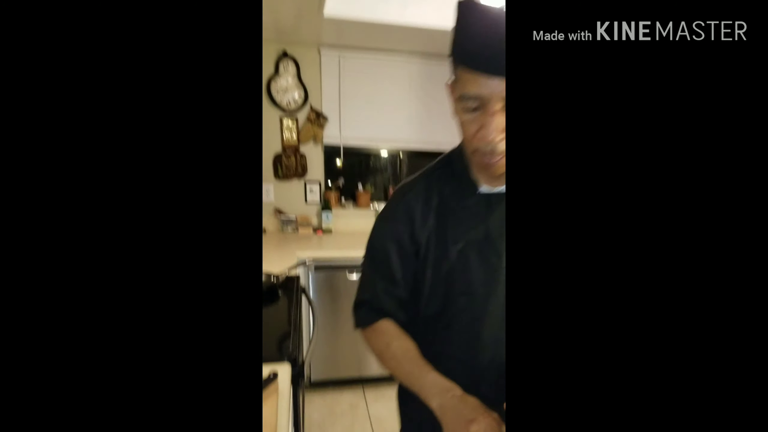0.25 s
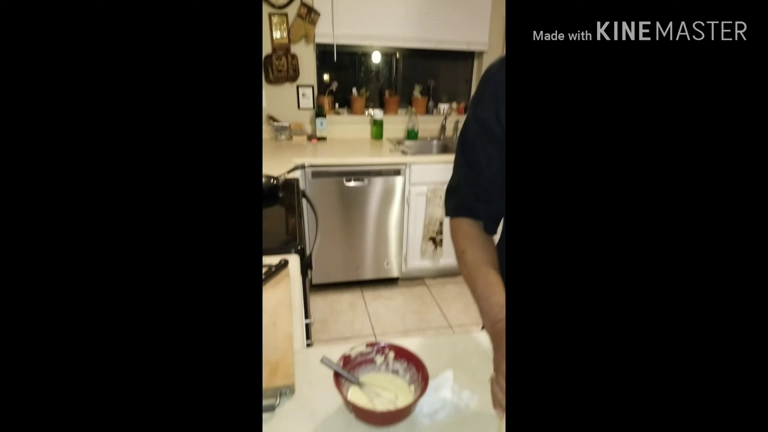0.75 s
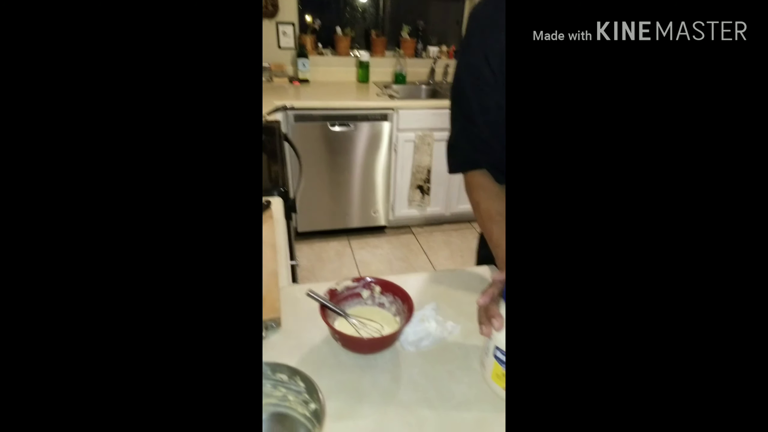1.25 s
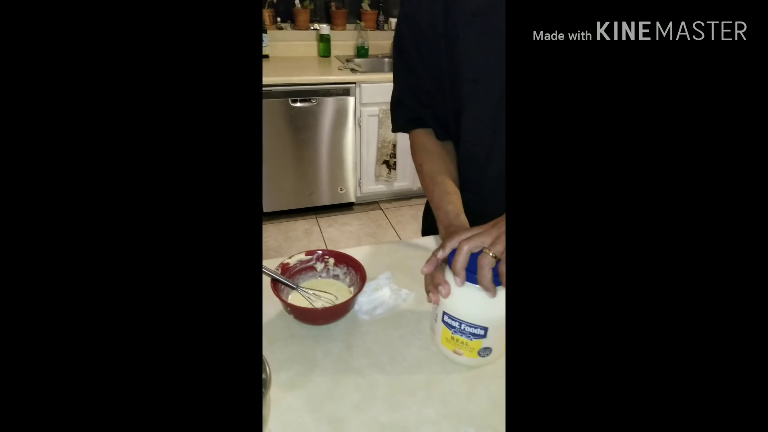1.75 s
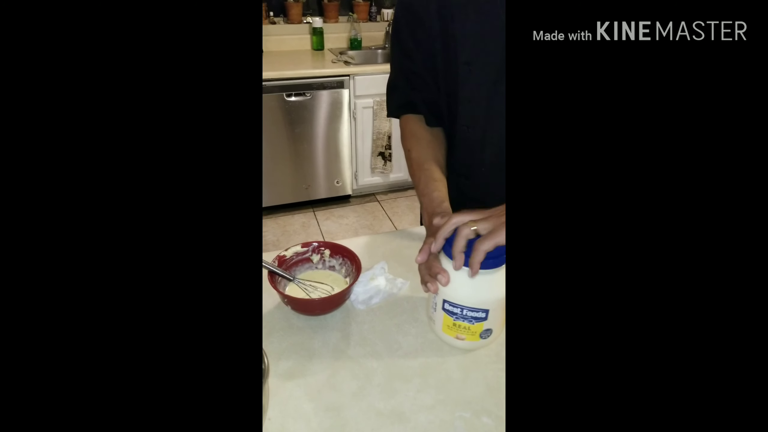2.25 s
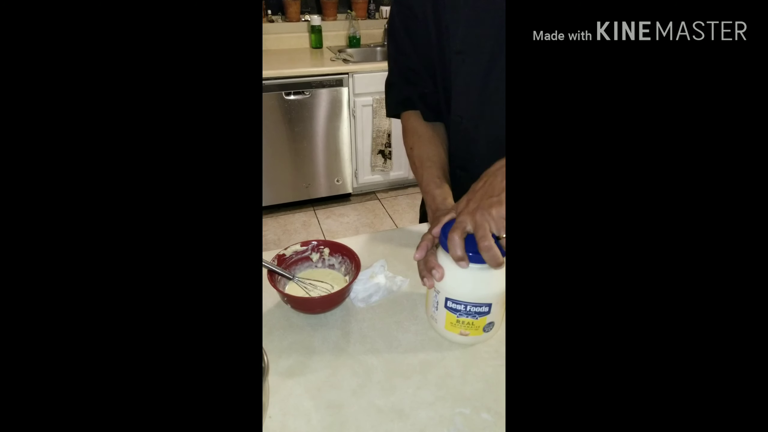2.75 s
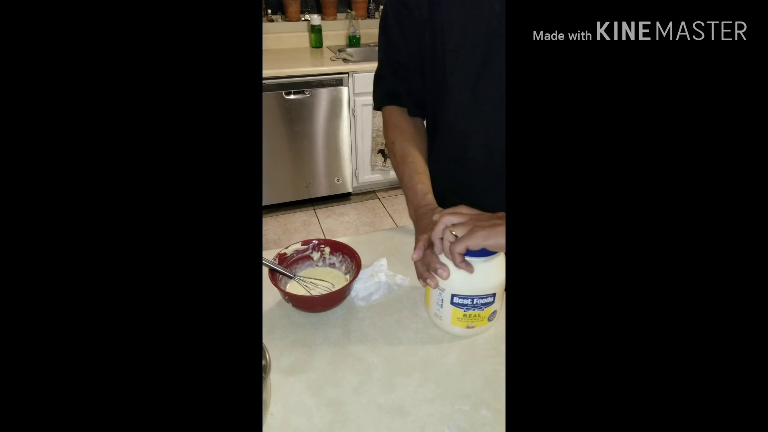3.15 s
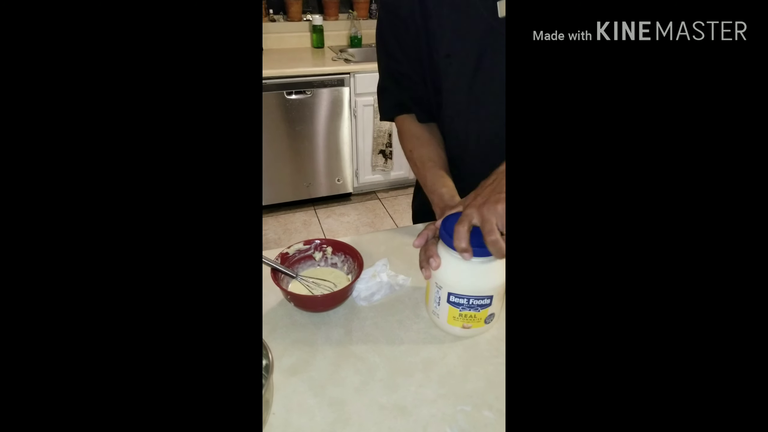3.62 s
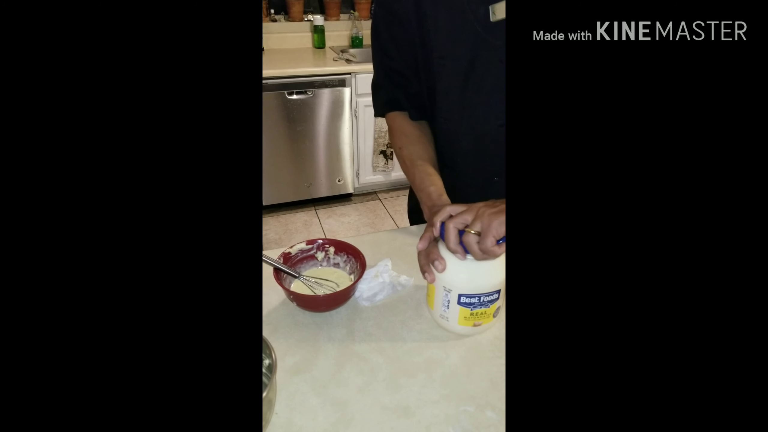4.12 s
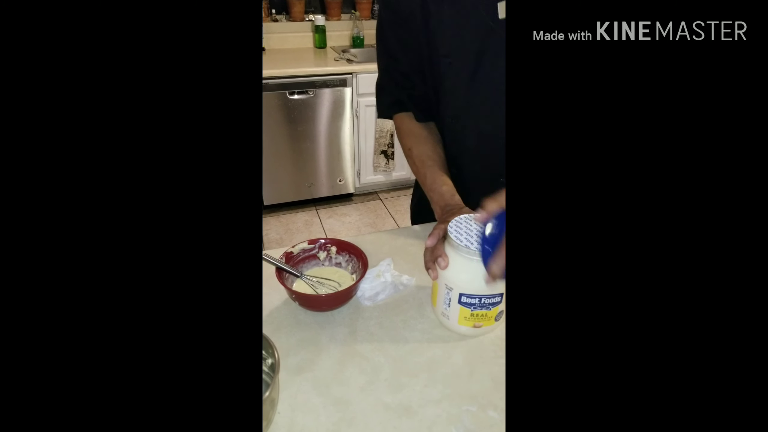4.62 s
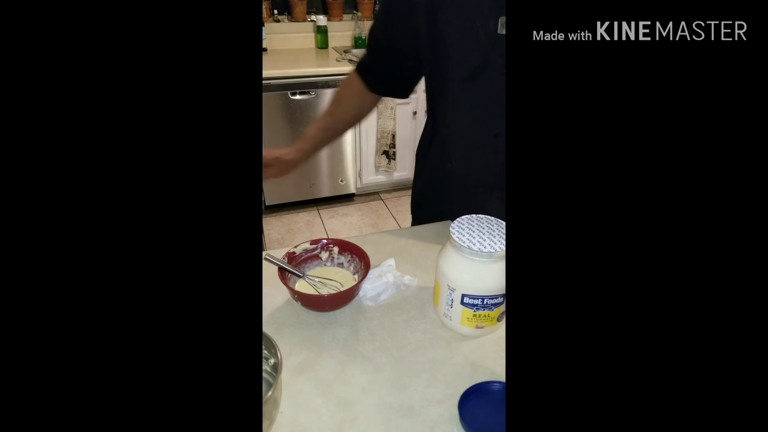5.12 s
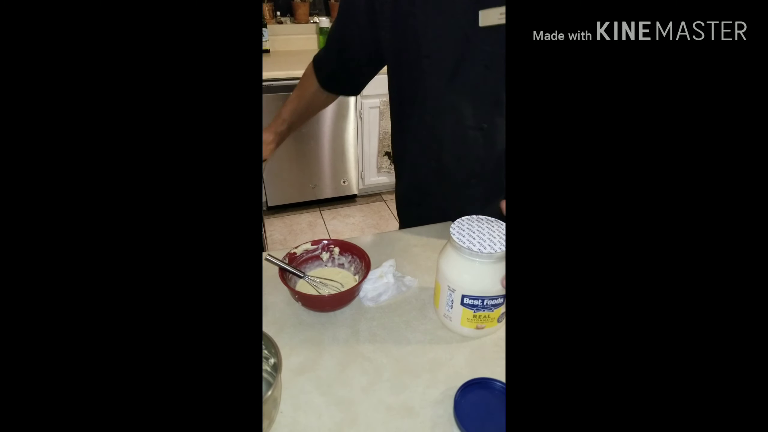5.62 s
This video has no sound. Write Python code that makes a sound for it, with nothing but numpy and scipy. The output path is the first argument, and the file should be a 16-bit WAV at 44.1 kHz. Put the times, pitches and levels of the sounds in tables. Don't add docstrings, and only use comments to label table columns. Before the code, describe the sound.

In a small kitchen with a low fridge hum, a heavy door slams at once, booming and clattering, a loose part ticking rapidly before a second, duller bounce. Then hands rub and twist a plastic jar lid in short hissing strokes, with snaps, a slap and soft counter thuds. The thread clicks free and the lid lands with a bright clack, tips and settles. Close stereo phone pickup.

```python
import sys
import numpy as np
from scipy import signal
from scipy.fft import rfft, irfft
from scipy.io import wavfile
from scipy.ndimage import uniform_filter1d

SR = 44100
rng = np.random.default_rng(int(sys.argv[2]) if len(sys.argv) > 2 else 0)


def gain_from_db(level_db):
    decades = np.asarray(level_db, float) / 20
    return 10 ** decades


def wrap_up_sound(samples):
    columns = np.atleast_2d(samples).T
    tamed = np.clip(columns, -1, 1)
    steps = np.round(tamed * 32767).astype(np.int16)
    wavfile.write(sys.argv[1], SR, steps)


N = 259308

# [start_s, boom_db, swell_ms, clatter_db, clatter_ms]
SLAM = [
    (.056, -7.5, 16, -12.5, 58.2),
]
DOOR_LAG, JAR_LAG = -20, 8
DOOR_PAN_DB, JAR_PAN_DB, LID_PAN_DB = 2.5, -0.5, -1.5


def unit(x):
    return x / np.sqrt(np.mean(x ** 2))


def colour(x, points):
    hz, db = np.transpose(points)
    n = x.shape[-1]
    f = np.maximum(np.arange(n // 2 + 1) * SR / n, 1)
    gain_db = np.interp(np.log(f), np.log(hz), db)
    return irfft(rfft(x) * gain_from_db(gain_db), n)


def band(x, lo_hz, hi_hz):
    edges_hz = [lo_hz, min(hi_hz, .45 * SR)]
    return signal.sosfilt(signal.butter(2, edges_hz, "bandpass", fs=SR, output="sos"), x)


def diffuse(n, apart_db=0.):
    mid, side = rng.standard_normal((2, n))
    side = gain_from_db(apart_db) * colour(side, [(25, -30.0), (125, -4.5), (300, -12.5), (600, -1.0), (16000, 1.5)])
    return np.array([mid + side, mid - side])


def walk(rate_hz):
    k = int(SR / rate_hz)
    steps = np.repeat(rng.standard_normal(N // k + 1), k)
    return 1.45 * uniform_filter1d(uniform_filter1d(steps, k), k)[:N]


def add(out, start_s, x):
    i = int(start_s * SR)
    out[..., i:i + x.shape[-1]] += x[..., :N - i]


def fade(t, t60_s):
    return gain_from_db(-60 * t / max(t60_s, .001))


def place(x, lag, wet_db):
    # [pitch_hz, t60_s]
    room = [(100, 0.32), (400, 0.36), (1500, 0.24), (4000, 0.21), (8000, 0.18), (14000, 0.14)]
    t = np.arange(SR // 2) / SR
    noise = diffuse(len(t))
    tail = sum(band(noise, hz / 1.57, hz * 1.447) * fade(t, t60_s) for hz, t60_s in room)
    bins = rfft(tail * np.minimum(t / 0.00067, 1))
    power = np.abs(bins) ** 2
    even = np.sqrt(uniform_filter1d(power, size=500) / uniform_filter1d(power, size=50))
    tail = irfft(bins * even)[:, :-500]
    tail = tail / np.sqrt(np.sum(tail ** 2) / 2)
    direct = np.array([np.roll(x[0], lag // 2), np.roll(x[1], -lag // 2)])
    return direct + gain_from_db(wet_db) * signal.fftconvolve(x, tail, axes=1)[:, :N]


def fridge():
    # [pitch_hz, level_db]
    floor = [(25, -42.5), (48, 0.5), (62, -1), (83, -1), (124, -11.5), (190, -4), (330, -5), (430, -4.5),
             (520, -20), (1000, -22.5), (3500, -36.5), (5500, -35.5), (9300, -41.5), (15500, -36)]
    # [pitch_hz, level_db]
    mains = [(60, -61.5), (120, -65.5)]
    floor_db, duck_db, duck_s = -57.5, -7, 1.56
    t = np.arange(N) / SR
    hum = sum(gain_from_db(db + 2.5 + 3.0 * walk(1.7)) * np.sin(2 * np.pi * hz * t) for hz, db in mains)
    dip_db = duck_db * np.exp(-(t / duck_s) ** 4) * (t > SLAM[0][0])
    return unit(colour(diffuse(N), floor)) * gain_from_db(floor_db + 0.52 * walk(1.6) + dip_db) + hum


def pushed_slab(pushes, rumble_db):
    out, t = np.zeros(N), np.arange(SR // 2) / SR
    for start_s, peak_db, hz, t60_s in pushes:
        rumble = unit(band(rng.standard_normal(len(t)), 77, 300)) * fade(t, 1.07 * t60_s)
        ring = np.sin(2 * np.pi * hz * t) * fade(t, t60_s)
        window = np.minimum(t / 0.0089, 1) * np.cos(np.pi * t)
        add(out, start_s, gain_from_db(peak_db) * (ring + gain_from_db(rumble_db) * rumble) * window)
    return out


def cabinet_rocking():
    # [start_s, peak_db, pitch_hz, t60_s]
    rocks = [
        (.54, -28.5, 97, 1.0),
        (.72, -29.5, 59.7, 0.42),
        (.80, -33, 98.3, 0.6),
        (.85, -40, 59.7, 0.36),
        (.82, -46, 263, 0.25),
        (.91, -36, 248, 0.068),
        (.945, -38, 58.7, 0.7),
    ]
    return pushed_slab(rocks, -20.0)


def counter_thuds():
    # [start_s, peak_db, pitch_hz, t60_s]
    thuds = [(0.004, -40, 194, 0.17), (0.397, -28, 78.2, 0.091), (1.404, -48.5, 830, 0.29),
             (1.443, -31.5, 1410, 0.03), (1.434, -39.5, 74.6, 0.26), (1.469, -37.5, 69, 0.158),
             (1.741, -42, 194, 0.14), (1.76, -46.5, 276, 0.19), (2.08, -42, 68, 0.26),
             (2.331, -49, 61.7, 0.067), (2.74, -45, 334, 0.14), (2.919, -50, 68, 1), (3.509, -49, 58, 1),
             (3.606, -41, 285, 0.17), (3.689, -42.5, 70.5, 0.46), (4.049, -46, 64.6, 0.21),
             (4.485, -38.5, 64, 0.31), (5.29, -42.5, 400, 0.21), (5.358, -30, 97, 0.06),
             (5.379, -39.5, 71.1, 0.5), (5.456, -36, 70.7, 0.53), (5.489, -34, 111, 0.14),
             (5.559, -50, 130, 0.1), (5.639, -43.5, 261.4, 0.26), (5.739, -40.5, 135, 0.14),
             (1.85, -52, 383, 0.41), (2.025, -44, 402, 0.11)]
    return pushed_slab(thuds, -6.0)


def struck_door(blows, modes, clatter):
    boom, rattle, t = np.zeros(N), np.zeros((2, N)), np.arange(SR) / SR
    short_t = t[:SR // 4]
    for start_s, boom_db, swell_ms, clatter_db, clatter_ms in blows:
        for hz, db, t60_s in modes:
            chance = rng.standard_normal(31)
            waver_db = 0.82 * np.interp(t * 30, np.arange(30), chance[1:])
            swell = (1 - np.exp(-t * 1000 / swell_ms * (hz / 300) ** 0.16)) ** 2
            tone = np.sin(2 * np.pi * (hz * t + chance[0])) * fade(t, t60_s)
            add(boom, start_s, gain_from_db(boom_db + db + waver_db) * tone * swell)
        jolts = unit(colour(diffuse(SR // 4, -0.82), clatter))
        add(rattle, start_s, gain_from_db(clatter_db) * jolts * np.exp(-(short_t * 1000 / clatter_ms) ** 1.44))
    return boom * np.array([[1.06], [.94]]), rattle


def door_slam():
    # [pitch_hz, level_db, t60_s]
    modes = [(59, -6.5, 0.69), (98.2, -1, 0.67), (119, -4.5, 0.15), (169, 3, 0.32), (191.8, 2, 0.29),
             (296, -7.5, 0.14), (320, -3, 0.34), (337.6, 8, 0.22), (413, -7, 0.27), (434.5, -6, 0.25),
             (485, -12, 0.32), (603, -12.5, 0.3), (745, -14, .22), (994, -17, .2)]
    # [pitch_hz, level_db]
    clatter = [(88, -24), (150, 0), (255, -9), (336, -6.5), (814, -20), (972, -14.5), (1050, -21),
               (1650, -19), (4970, -26.5), (12500, -41.5), (16500, -65)]
    return struck_door(SLAM, modes, clatter)


def door_bounces():
    # [start_s, boom_db, swell_ms, clatter_db, clatter_ms]
    bounces = [
        (.378, -43, 1.3, -31.5, 8.1),
        (.489, -9.5, 16.5, -15.5, 22),
        (.680, -32.5, 2.2, -40.5, 60),
        (.816, -37.5, 5, -42, 21),
        (.908, -39, 7.2, -52.5, 12.2),
    ]
    # [pitch_hz, level_db, t60_s]
    modes = [(62.6, -17, .64), (97, -16, 0.3), (135, -5.5, 0.15), (170, -2.5, 0.2), (194, -12, 0.36),
             (265, 3.5, 0.067), (302, -5.5, 0.26), (338, -4.5, 0.29), (405, -10.5, 0.18),
             (442.3, -15, 0.22), (484, -17, 0.17), (531, -14, 0.17), (600, -18, 0.2), (666, -35, .15)]
    # [pitch_hz, level_db]
    clatter = [(88, -4), (150, 4), (343, -0.5), (682, -20.5), (2650, -18.5), (3350, -36), (3700, -26),
               (11100, -41.5), (15300, -48), (16500, -74.5)]
    return struck_door(bounces, modes, clatter)


def loose_part():
    # [start_s, tick_db, ping_db]
    swings = [
        (0.1111, -19.5, -28.5),
        (0.1636, -22, -33.5),
        (0.2141, -25.5, -36.5),
        (0.2639, -26, -38),
        (0.3132, -27.5, -37.5),
        (0.365, -29.5, -39.5),
        (0.4164, -32.5, -40.5),
        (0.465, -38, -49),
    ]
    out, t = np.zeros((2, N)), np.arange(SR // 50) / SR
    for start_s, tick_db, ping_db in swings:
        knock = diffuse(len(t), -2.1)
        ping = np.sin(2 * np.pi * 6400 * t)
        add(out, start_s + .0008, gain_from_db(tick_db + 4) * band(knock, 10500, 16000) * fade(t, 0.013))
        add(out, start_s + .002, gain_from_db(ping_db + 9) * band(knock, 2400, 8000) * fade(t, .03))
        add(out, start_s + .0042, gain_from_db(ping_db + 12) * ping * fade(t, .006))
    return out


def clicks(contacts, modes, pan_db, body_lo_hz=380):
    out, t = np.zeros((2, N)), np.arange(SR // 14) / SR
    for start_s, peak_db, body_db, fizz_db, length_ms in contacts:
        grain_db = 2.5 * rng.standard_normal(len(t) // 16 + 1).repeat(16)[:len(t)]
        crack = diffuse(len(t), -4.) * gain_from_db(grain_db)
        age = t * 1000 / max(length_ms, .3)
        force = np.exp(-age) * (1 - np.exp(-age / 0.11))
        energy = np.sum(force ** 2)
        bins = rfft(crack * force)
        even = np.sqrt(energy / uniform_filter1d(np.abs(bins) ** 2, size=18))
        crack = irfft(bins * even, len(t)) * (t < .06)
        crack[:, 8] += 0.53 * np.sqrt(energy) * min(0.52 / length_ms, 1) ** 2
        middle = 0
        for k, (hz, width_hz, db) in enumerate(modes):
            ring = band(crack, hz - width_hz / 2, hz + width_hz / 2) * np.sqrt(5500 / width_hz)
            middle = middle + (-1) ** k * gain_from_db(db) * ring
        body = band(band(crack, body_lo_hz, 1300), body_lo_hz, 1300)
        fizz = band(crack, 10000, 20000)
        x = gain_from_db(peak_db - 6.5) * middle + gain_from_db(body_db + 14.0) * body + gain_from_db(fizz_db + 9.5) * fizz
        add(out, start_s + .0005, x * gain_from_db(np.array([[pan_db], [-pan_db]]) / 2))
    return out


def door_latch():
    # [start_s, peak_db, body_db, fizz_db, length_ms]
    strikes = [
        (.0555, -2.5, -24, -24, 2.4),
        (.059, 0, -25, -25.5, 1.7),
        (.0655, -3, -21, -25, 2.2),
        (.0675, -15, -22.5, -28, 1.7),
        (0.487, -24, -26, -56, 2.2),
        (0.4895, -8.5, -22, -53.5, 1.5),
        (0.4925, -8.5, -15, -54, 1.7),
        (0.5072, -17.5, -24, -38.5, 3.1),
        (0.5818, -36, -36, -51.5, 2.9),
    ]
    return clicks(strikes, [(2160, 1800, 4.0), (5900, 1900, -4.0)], DOOR_PAN_DB)


def door_knocks():
    # [start_s, peak_db, body_db, fizz_db, length_ms]
    knocks = [(.379, -32.5, -42, -60.5, 4.6), (0.6795, -18.5, -31.5, -62, 2.7),
              (.685, -36, -27.5, -68, 2.8), (.694, -37, -41, -72, 2.8), (.7125, -43, -43, -63, 4),
              (.722, -46, -41, -76, 3.2), (.792, -43, -39.5, -78, 3.6), (0.8145, -41, -35, -75, 4.6),
              (.838, -47.5, -50, -64, 3.7), (0.9072, -55.5, -43.5, -75, 4.7), (.935, -55, -58, -76, 3)]
    # [pitch_hz, width_hz, level_db]
    modes = [(1110, 530, 1), (1720, 700, -11), (2560, 340, -7.5)]
    return clicks(knocks, modes, DOOR_PAN_DB)


def shelf_shivers():
    # [start_s, peak_db, body_db, fizz_db, length_ms]
    shivers = [
        (.766, -43, -90, -83, 30),
        (.81, -53, -90.5, -85, 25),
    ]
    # [pitch_hz, width_hz, level_db]
    modes = [(14700, 900, 1)]
    return clicks(shivers, modes, DOOR_PAN_DB)


def slide_gains():
    # [start_s, length_s, first_db, last_db, bright_db]
    twists = [
        (1.15, 0.22, -58, -65, -3),
        (1.83, 0.092, -58.5, -54, 3.5),
        (1.965, 0.03, -58.5, -57, 15),
        (2.49, 0.024, -62.5, -63, -10),
        (2.53, 0.25, -61, -50, 0.5),
        (3.35, 0.14, -58.5, -54.5, -5),
        (3.53, 0.079, -54.5, -53, 3.5),
        (4.16, 0.041, -53.5, -58.5, -16),
        (4.24, 0.257, -54, -57, 0),
    ]
    # [start_s, length_s, first_db, last_db, bright_db]
    brushes = [(0.0, 0.076, -71.5, -64.5, -45), (.2, 0.39, -50, -60.5, -3), (.62, 0.056, -69, -62, -3),
               (.85, 0.18, -64.5, -78.5, -3), (1.012, 0.016, -72, -69.5, 8), (1.05, 0.061, -76, -70.5, 2),
               (1.55, 0.19, -77, -75, -8.5), (2.12, 0.12, -79.5, -85, -4.5),
               (2.24, 0.093, -71.5, -62.5, -22), (2.4, 0.18, -68, -81, -10), (2.82, 0.082, -63, -62, -7),
               (2.955, 0.0061, -85, -58, 15), (2.99, 0.086, -70, -67, -12.5), (3.81, 0.2, -59, -72, -10),
               (4.035, 0.012, -82, -68.5, -8.5), (4.555, 0.03, -63, -65.5, -4.5),
               (4.77, 0.045, -78.5, -77.5, -30.5), (4.83, .02, -78.5, -76, 4.5),
               (4.92, 0.029, -68, -56, -8), (5.0, 0.06, -81, -68, -19), (5.2, 0.11, -72, -48, -26),
               (5.4, 0.033, -56, -61, -14), (5.46, 0.038, -60, -65.5, -12), (5.57, 0.05, -55, -68, -8),
               (5.69, 0.063, -72.5, -79, -41)]
    # [start_s, length_s, first_db, last_db, bright_db]
    drags = [
        (1.41, 0.023, -54, -47, 7),
        (2.05, 0.0082, -58, -51.5, -1),
        (3.65, 0.059, -53, -52, -1.5),
    ]
    grip_db_per_s, let_go_db_per_s = 348, 247
    fizz_steeper, body_steeper = 1.8, 1
    body_per_bright = -0.3
    gains, t = np.zeros((3, N)), np.arange(N) / SR
    for slides, body_db in ((twists, -13.5), (brushes, -6), (drags, -3)):
        for start_s, length_s, first_db, last_db, bright_db in slides:
            near = slice(max(int((start_s - .2) * SR), 0), int((start_s + length_s + .3) * SR))
            age = t[near] - start_s
            held_db = np.interp(age, [0, length_s], [first_db, last_db])
            edge_db = grip_db_per_s * np.minimum(age, 0) - let_go_db_per_s * np.maximum(age - length_s, 0)
            fizz_edge_db = fizz_steeper * edge_db + bright_db
            body_edge_db = body_steeper * edge_db + body_db + body_per_bright * bright_db
            gains[:, near] += gain_from_db(held_db + np.array([edge_db, fizz_edge_db, body_edge_db]))
    return gains


def rubbing():
    # [pitch_hz, level_db]
    rub_colour = [(400, 4.5), (1000, 1), (2100, -6.5), (3700, -8.5), (4600, -3.5), (6000, -4.5), (9300, -8),
                  (11500, -3), (13500, -4), (15500, -4.5)]
    patchy_db = 0.8
    hiss_gain, fizz_gain, body_gain = slide_gains()
    slips = colour(diffuse(N) * gain_from_db(1.2 * rng.exponential(size=N)), rub_colour)
    low = colour(slips, [(1200, -30), (1900, 0), (3300, 0), (3700, -6), (4600, -25)])
    high = colour(slips, [(2900, -25), (3700, -6), (4100, 0), (7500, 0), (10500, -25)])
    hiss = unit(low * gain_from_db(patchy_db * walk(17)) + high * gain_from_db(-3.3 + patchy_db * walk(17)))
    fizz = unit(colour(slips, [(7000, -25), (10000, 0), (16000, 0)]))
    body = unit(colour(slips, [(300, -29.5), (550, -4.5), (900, 1), (1400, 2.5), (1800, -1.5), (2500, -27)]))
    hiss = hiss * hiss_gain * gain_from_db(.5 * walk(30) + 1.3 * walk(90) + np.array([[-1.2], [1.2]]))
    fizz = fizz * fizz_gain * gain_from_db(0.94 * walk(33) + np.array([[-1.6], [1.6]]))
    return hiss + fizz + body * body_gain * gain_from_db(1.2 * walk(30))


def thread_snaps():
    # [start_s, peak_db, body_db, fizz_db, length_ms]
    snaps = [(0.765, -28, -38, -56, 1.74), (1.0166, -42.5, -73, -68, 1.85), (1.409, -39, -54, -67, 3),
             (1.415, -42, -49, -62, 2), (1.4225, -24.5, -39, -59, 0.7), (1.434, -26, -37, -62, 1.3),
             (1.447, -29, -43, -63.5, 2), (2.7406, -15.5, -35.5, -25.5, 2.2),
             (2.7439, -18.5, -39.5, -22, 2.1), (2.7475, -26, -49, -29.5, 0.84),
             (2.7512, -30, -56.5, -30, 1), (2.7575, -33, -54, -41, 2.1), (2.772, -41, -56, -40, 3.5),
             (2.9478, -27, -39.5, -41, 1.1), (3.7684, -23.5, -47.5, -35, 0.91), (3.771, -31, -51, -58, 3),
             (3.779, -50, -47, -56, 4), (3.7881, -47, -48, -70, 2.2), (4.9341, -52, -66, -61.5, 2.15),
             (4.9754, -35, -53, -67, 3.5)]
    # [pitch_hz, width_hz, level_db]
    modes = [(2400, 810, -1), (3180, 1360, -8.5), (5050, 870, -1), (7150, 3300, -3.5)]
    return clicks(snaps, modes, JAR_PAN_DB)


def palm_slaps():
    # [start_s, peak_db, body_db, fizz_db, length_ms]
    slaps = [
        (1.7436, -17.5, -27, -32, 4),
        (1.7465, -30.5, -28, -49, 3.4),
        (1.7514, -34, -44, -32, 3.7),
        (1.762, -29, -50, -56, 1.7),
    ]
    # [pitch_hz, width_hz, level_db]
    modes = [(293, 300, -3.5), (713, 390, 5.5), (1430, 740, -4.5), (2580, 1140, 0), (3700, 1000, -3),
             (4760, 800, 0.5), (7380, 3500, 1)]
    return clicks(slaps, modes, JAR_PAN_DB)


def fingertip_taps():
    # [start_s, peak_db, body_db, fizz_db, length_ms]
    taps = [
        (2.346, -23, -42, -46, 1.8),
        (2.351, -40, -37.5, -52, 1.7),
    ]
    # [pitch_hz, width_hz, level_db]
    modes = [(400, 120, -2.5), (2240, 600, 1), (3184, 1200, -9), (4710, 1300, -9.5), (6350, 3100, -5.5)]
    return clicks(taps, modes, JAR_PAN_DB)


def thread_releases():
    # [start_s, peak_db, body_db, fizz_db, length_ms]
    releases = [(4.4638, -39.5, -44, -42.5, 1.1), (4.478, -36, -53, -44, 4), (4.485, -43, -37.5, -52, 2.04),
                (4.4912, -29, -58, -31, 1.7), (4.4935, -17.5, -59, -25.5, 2.8),
                (4.4985, -30, -39, -30.5, 2.6), (4.504, -29, -53, -42, 2), (4.5095, -36, -58, -39.5, 2.2),
                (4.516, -38, -52, -39.5, 2.3), (4.5225, -30, -46, -43.5, 2.3),
                (4.5296, -31, -55, -37.5, 2.2), (4.536, -42, -47, -46.5, 2.2),
                (4.5495, -47, -59.5, -57, 1.4)]
    # [pitch_hz, width_hz, level_db]
    modes = [(348, 140, -12), (1490, 1100, -13.5), (2800, 1200, 0), (4510, 960, -2), (5850, 1200, 1),
             (7270, 800, 0.5), (8740, 1600, -5)]
    return clicks(releases, modes, JAR_PAN_DB)


def lid_lands():
    # [start_s, peak_db, body_db, fizz_db, length_ms]
    landings = [
        (5.107, -11.5, -49, -41.5, 1.22),
        (5.1088, -15.5, -49, -46.5, 1.1),
        (5.1104, -15.5, -49, -51, 1.4),
        (5.114, -33, -55, -57, 0.96),
        (5.126, -35, -56, -60, 2),
    ]
    # [pitch_hz, width_hz, level_db]
    modes = [(1250, 530, -1.5), (1890, 420, -6), (2360, 480, -1), (2990, 710, -2), (4160, 600, 2.5),
             (4700, 650, -5.5), (5500, 750, -1.5), (7060, 2200, -5.5)]
    # [start_s, peak_db, pitch_hz, t60_s]
    rings = [(5.108, -49.5, 3500, .38), (5.108, -50.5, 4000, .33), (5.108, -52.5, 2600, 0.29),
             (5.108, -59, 4700, 0.27), (5.108, -48, 4324, 0.32), (5.108, -49, 3000, 0.44),
             (5.108, -44, 2364, 0.41), (5.108, -48, 2100, 0.33), (5.108, -51.5, 3040, .2),
             (5.108, -50.5, 1051, 0.24)]
    return clicks(landings, modes, LID_PAN_DB, body_lo_hz=836) + pushed_slab(rings, -36.0)


def lid_drops():
    # [start_s, peak_db, body_db, fizz_db, length_ms]
    drops = [(5.2812, -16, -40, -36.5, 1.8), (5.2845, -20, -44, -52, 3.3), (5.291, -24.5, -28.5, -60, 3),
             (5.2985, -32.5, -37, -60, 3.7), (5.3128, -4, -30, -27.5, 0.46), (5.3155, -21.5, -36, -48, 3.8),
             (5.3195, -22, -39, -49.5, 1.2), (5.3238, -20, -42, -42.5, 0.54), (5.3265, -30, -42, -55, 1.7),
             (5.331, -35, -46, -54, 1.45), (5.338, -38, -53, -62, 2.7)]
    # [pitch_hz, width_hz, level_db]
    modes = [(1180, 650, -7), (2400, 920, 0.5), (3780, 1150, -2), (4990, 1100, 1.5), (6170, 1200, -4),
             (7300, 2100, -8.5)]
    return clicks(drops, modes, LID_PAN_DB, body_lo_hz=836)


def lid_rests():
    # [start_s, peak_db, body_db, fizz_db, length_ms]
    wobbles = [(5.361, -39, -53, -44, 4.2), (5.3675, -38, -35, -56, 1.9),
               (5.3735, -23.5, -33.5, -44.5, 2.1), (5.378, -36, -27.5, -57, 1.7),
               (5.384, -45, -48, -62, 3.4), (5.4556, -37, -36, -53, 6.3), (5.466, -42, -35.5, -61, 7.1),
               (5.4794, -56, -36, -77, 6.8), (5.49, -53, -41, -75, 6.7), (5.5465, -38.5, -50, -60, 4.5),
               (5.5559, -38, -47, -46.5, 6), (5.6345, -52, -44.5, -77.5, 7.4), (5.6675, -62, -45, -72, 4.1)]
    # [pitch_hz, width_hz, level_db]
    modes = [(1000, 430, -6), (1950, 1300, 3.5), (3380, 1800, 0), (4800, 520, 3.5), (6400, 1900, 0)]
    return clicks(wobbles, modes, LID_PAN_DB)


def scene():
    slam_boom, slam_clatter = door_slam()
    bounce_boom, bounce_clatter = door_bounces()
    contacts = door_latch() + door_knocks() + shelf_shivers()
    door = slam_boom + bounce_boom + place(slam_clatter + bounce_clatter + contacts, DOOR_LAG, -6.5)
    door = door + place(loose_part(), DOOR_LAG, -11.5)
    hand = thread_snaps() + palm_slaps() + thread_releases() + fingertip_taps()
    jar = place(hand, JAR_LAG, -2.5) + rubbing()
    lid = place(lid_lands(), JAR_LAG, -0.9) + place(lid_drops() + lid_rests(), JAR_LAG, -6.0)
    return fridge() + cabinet_rocking() + counter_thuds() + door + jar + lid


def low_pass(x):
    return signal.sosfilt(signal.butter(12, 16660, fs=SR, output="sos"), x)


def record(dry):
    rounded = np.tanh(.8 * dry) / .8
    response = [(30, -12), (38, -3), (45, 0), (15400, 0), (15800, -25), (16600, -33), (17000, -70)]  # (Hz, dB)
    return low_pass(colour(rounded, response))


dry = scene()
out = record(dry)
wrap_up_sound(out)
```